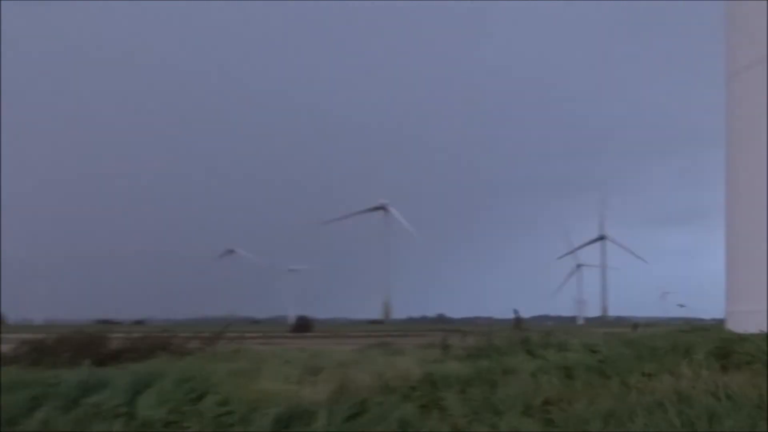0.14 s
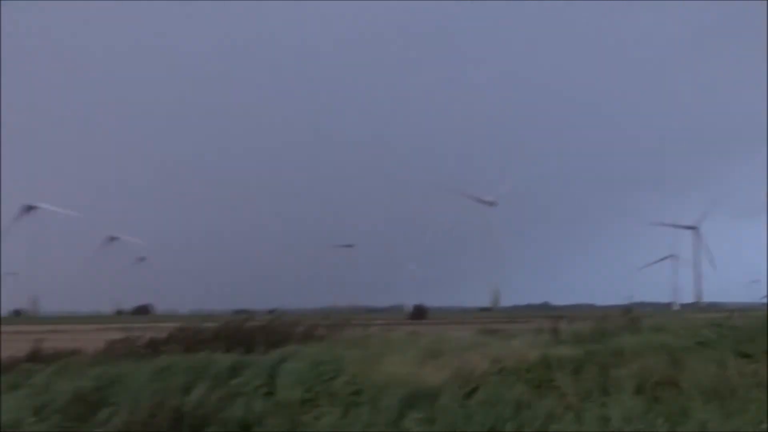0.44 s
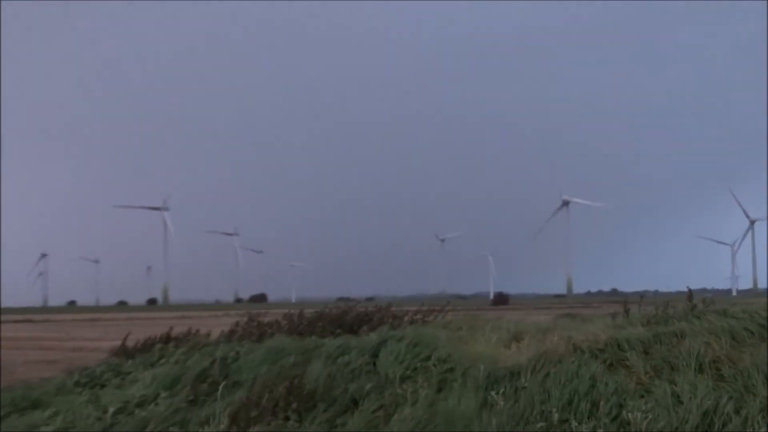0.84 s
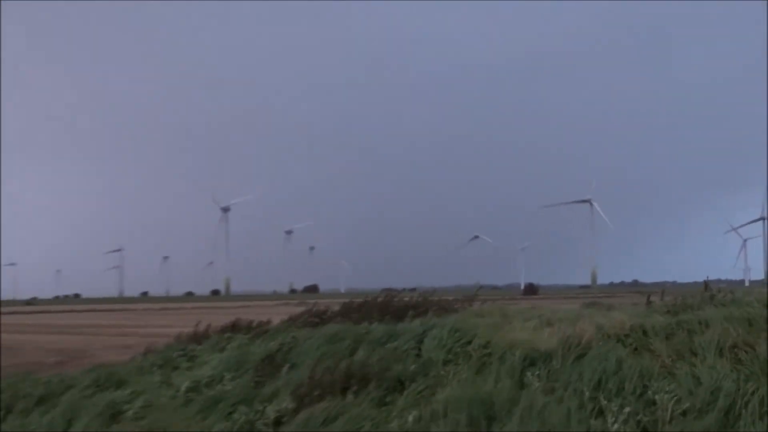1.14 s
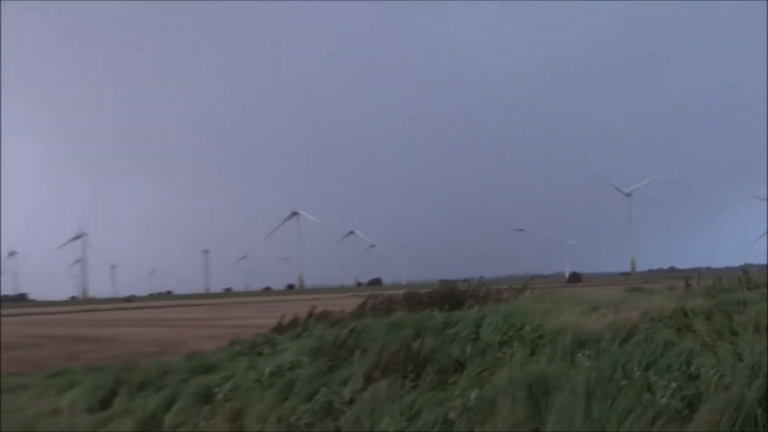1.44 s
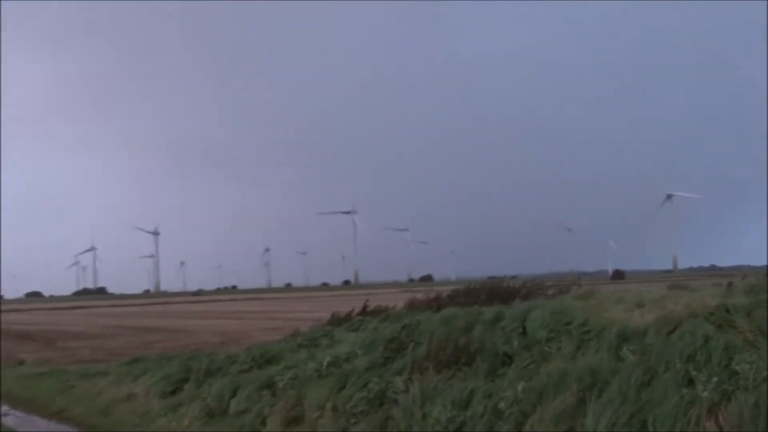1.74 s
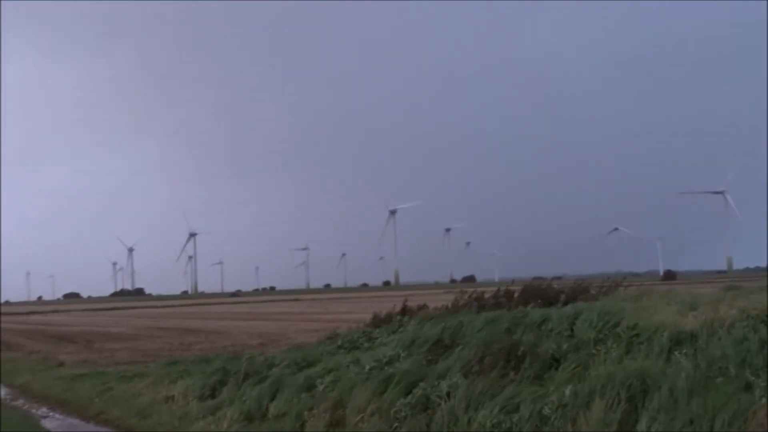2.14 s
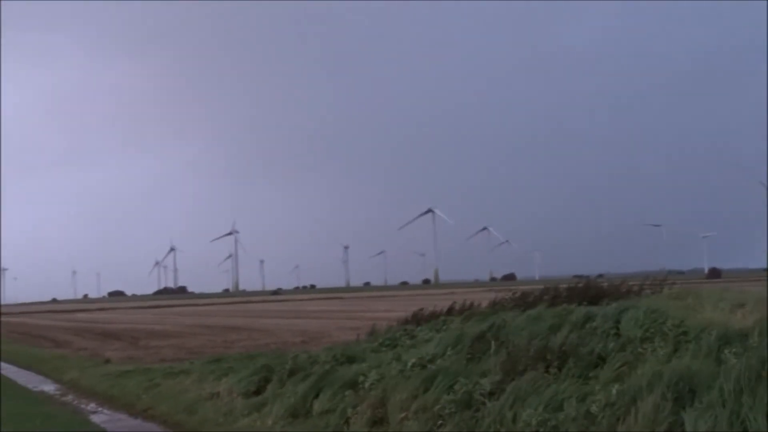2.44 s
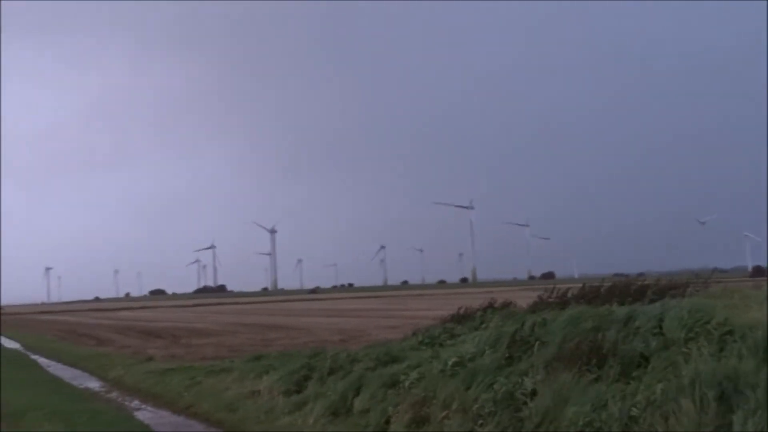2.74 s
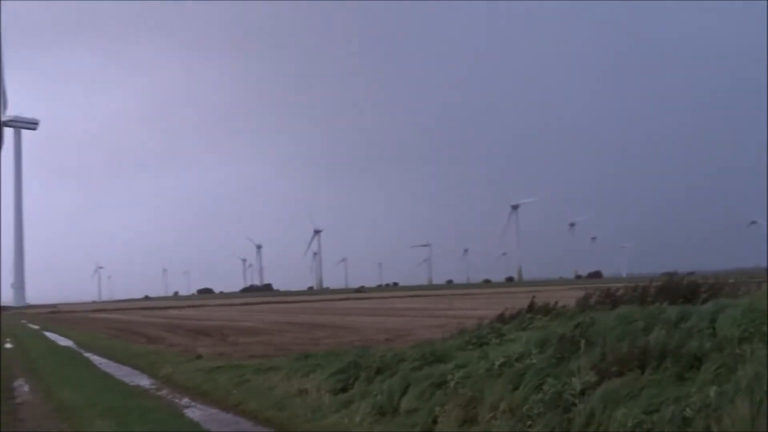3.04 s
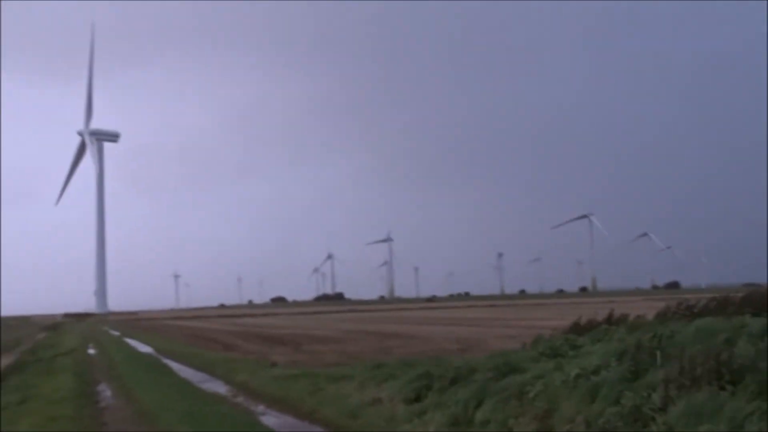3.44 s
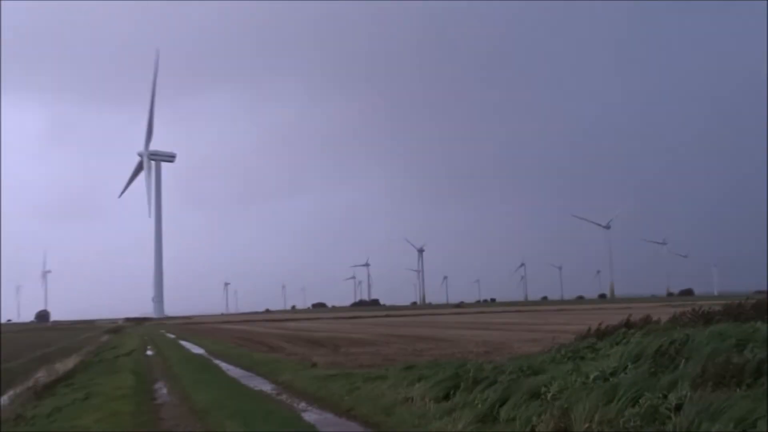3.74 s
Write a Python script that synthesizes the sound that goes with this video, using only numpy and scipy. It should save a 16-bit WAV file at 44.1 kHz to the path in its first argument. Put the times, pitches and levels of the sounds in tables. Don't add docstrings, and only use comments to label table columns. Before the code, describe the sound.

Storm wind roars directly on a hand-held camera's stereo microphone in an open field. Low, wide buffeting comes in slaps and ragged tearing bursts from the start, with a sharp spit near 0.8 s. A hard gust around 1.2 s breaks into short lulls. The wind drops near 2.2-2.4 s, then shoves again around 2.7 s. Grass hisses in puffs; a low hollow hum grows until the end.

```python
import sys
import numpy as np
from scipy import signal
from scipy.fft import rfft, irfft, next_fast_len
from scipy.io import wavfile
from scipy.ndimage import uniform_filter1d, map_coordinates

SR = 44100
rng = np.random.default_rng(int(sys.argv[2]) if len(sys.argv) > 2 else 0)


def put_to_file(sound):
    columns = np.atleast_2d(sound).T
    safe = np.clip(columns, -1, 1)
    whole_steps = np.round(safe * 32767)
    wavfile.write(sys.argv[1], SR, whole_steps.astype(np.int16))


def elevation(decibels):
    levels = np.asarray(decibels, float)
    return 10 ** (levels / 20)


N = 171108

# start_s, level_db
HISS_CURVE = [(0.0, -63), (0.3, -56.5), (0.6, -57.5), (0.9, -53.5), (1.19, -54), (1.49, -55.5),
              (1.79, -51.5), (2.09, -58.5), (2.39, -56), (2.69, -57.5), (2.98, -55.5), (3.28, -66),
              (3.58, -57), (3.88, -58)]
# start_s, body_shake_db, wind_on_both_ports_db
CAMERA_TURN = [
    (0, -23.5, -3),
    (.4, -29.5, -5.5),
    (.8, -31.5, 0.5),
    (1.35, -29.5, 0),
    (2.1, -29, 1.4),
    (2.65, -29.5, -1.5),
    (3.2, -30, 0.8),
    (3.55, -29, 0.6),
    (3.88, -31.5, 0.5),
]


def unit(x):
    return x / np.sqrt(np.mean(x ** 2) + 1e-20)


def along(points, hz):
    f, v = np.transpose(points)
    return np.interp(np.log(hz + 1), np.log(f + 1), v)


def column(rows, index):
    rows = np.transpose(rows)
    return np.interp(np.arange(N) / SR, rows[0], rows[index])


def level(curve, bumps, sign):
    t = np.arange(0, N + 64, 64) / SR
    s, length, height_db = np.transpose(bumps)[:, :, None]
    bells = np.exp(-(2 * (t - s) / np.maximum(length, 1e-3)) ** 2)
    db = np.interp(t, *np.transpose(curve)) + sign * (height_db * bells).sum(0)
    return np.interp(np.arange(N) / SR, t, db)


def wobble(rate):
    return map_coordinates(rng.standard_normal(N // 20), [np.arange(N) * rate / SR])


def filtered(x, response):
    m = next_fast_len(N + SR // 2)
    return irfft(rfft(x, m) * response(np.fft.rfftfreq(m, 1 / SR)), m)[..., :N]


def coloured(x, spectrum, gain_db):
    return unit(filtered(x, lambda hz: elevation(along(spectrum, hz)))) * elevation(gain_db)


def rush(patchy_db, lumps_db):
    z = signal.stft(rng.standard_normal((2, N)), nperseg=512)[2]
    field = uniform_filter1d(rng.standard_normal(z.shape[1:]), size=8, axis=0)
    field = uniform_filter1d(field, size=8, axis=1)
    noise = signal.istft(z * elevation(patchy_db * unit(field)), nperseg=512)[1][:, :N]
    return unit(noise * elevation(lumps_db))


def leaning(a, b):
    # pitch_hz, share
    lean = [(35, 0.47), (90, 0.54), (250, 0.55), (450, 0.64), (800, -0.2), (1500, -0.27), (4000, -0.045)]
    share = lambda hz: np.clip(along(lean, hz), -.99, .99)
    return filtered(a, share) + filtered(b, lambda hz: np.sqrt(1 - share(hz) ** 2))


def grass(puff_db, eddy_db, spit_db):
    # pitch_hz, level_db
    air_colour = [(500, 4.5), (2000, -6), (5400, 2.5), (6600, -2.5), (8500, -2.5), (10500, -8.5),
                  (12000, -23), (15700, -40)]
    # pitch_hz, level_db
    air_side_colour = [(3000, -24), (7000, -14), (8500, -10), (10500, -6), (12000, -14), (15700, -26)]
    # pitch_hz, level_db
    fine_colour = [(7500, -25), (10000, 7), (13300, 7.5), (14500, 0), (15700, -4), (16000, -60)]
    # pitch_hz, level_db
    far_colour = [(150, 15), (1000, -5), (5800, -23), (9000, -39)]
    # start_s, level_db
    fizz_curve = [(0, -61), (.25, -71), (.75, -69), (1.1, -58), (1.45, -67.5), (2.0, -64.5), (2.4, -61.5),
                  (2.6, -67.5), (3.1, -72.5), (3.52, -62), (3.7, -77), (3.88, -77)]
    # middle_s, length_s, rise_db
    swells = [(0.06, 0.091, 13), (0.18, 0.018, 3), (0.404, .04, 5), (.62, 0.012, 10), (0.927, 0.022, 21),
              (1.025, .025, 9), (1.14, 0.037, 15), (1.287, .05, 4), (1.547, 0.034, 17), (2.183, 0.045, 11),
              (2.31, 0.042, 12), (2.39, 0.028, 6), (2.74, 0.075, -4), (3.52, 0.12, 0), (3.71, .03, 0)]
    air_db, air_wide_db, air_left_db = 1.5, -12.5, -0.5
    fizz_gain_db, fizz_puffs, fizz_wide_db = 3, 0.05, -6.5

    grain_db = 0.41 * eddy_db + 2.7 * wobble(29.95) + spit_db
    a, b = rush(patchy_db=2.0, lumps_db=grain_db + 3.0 * wobble(500))
    mid = coloured(a, air_colour, puff_db + air_db)
    side = coloured(b, air_side_colour, puff_db + air_db + air_wide_db)

    a, b = rush(patchy_db=-2.5, lumps_db=0.85 * grain_db + 1.8 * wobble(300))
    puffs_only_db = puff_db - column(HISS_CURVE, index=1)
    fizz_db = level(fizz_curve, swells, 0.53) + fizz_gain_db + fizz_puffs * puffs_only_db
    mid = mid + coloured(a, fine_colour, fizz_db)
    side = side + coloured(b, fine_colour, fizz_db + fizz_wide_db)

    far = rush(patchy_db=1.5, lumps_db=wobble(4))[0]
    mid = mid + coloured(far, far_colour, gain_db=-57)
    return np.array([mid + side, mid - side]) * elevation([[air_left_db], [-air_left_db]])


def drone(gust_db):
    # pitch_hz, level_db
    hum_colour = [(90, -60), (140, -0.5), (200, 3), (245, -9.5), (330, -60.5)]
    start_db, grows_db_per_s, follows_wind = -43.5, 3.5, 0.64
    air = rush(patchy_db=1.5, lumps_db=3.4 * wobble(11))[0]
    hum_db = start_db + grows_db_per_s * np.arange(N) / SR + follows_wind * (gust_db - gust_db.mean())
    return coloured(air, hum_colour, hum_db) * elevation([[3.5], [-3.5]])


def body(gust_db):
    # pitch_hz, level_db
    rumble_colour = [(8.8, -60), (40, -12.5), (92, 3), (161, -3), (200, -8.5), (260, -15), (440, -120)]
    # pitch_hz, level_db
    sway_colour = [(8.8, -35), (22, -5.5), (60, -3), (95, -10.5), (150, -120)]
    # middle_s, length_s, rise_db
    shoves = [(0.057, 0.12, -6.5), (0.406, 0.034, 4), (0.975, .06, 8), (1.397, .07, 8), (1.61, 0.022, 9),
              (1.729, 0.032, 7.5), (1.873, 0.17, 5), (2.417, 0.029, 15), (2.623, 0.14, 10.5),
              (2.747, 0.034, -2), (3.148, .08, 8), (3.356, 0.088, 1)]
    rumble_db, rumble_follows, rumble_left_db = -0.5, 0.48, 3
    start_sway_db, sway_fades_db_per_s = -30, 3

    swing_db = gust_db - gust_db.mean()
    push, slow = rush(patchy_db=-0.14, lumps_db=1.5 * wobble(7.6))
    shove_db = level([row[:2] for row in CAMERA_TURN], shoves, 0.8) + rumble_follows * swing_db
    shake = coloured(push, rumble_colour, rumble_db + shove_db)
    shake = shake * elevation([[rumble_left_db], [-rumble_left_db]])
    sway_db = start_sway_db + 0.29 * swing_db - sway_fades_db_per_s * np.arange(N) / SR
    return shake + coloured(slow, sway_colour, sway_db)


def spits(gust_db):
    # start_s, peak_db
    spit_events = [(0.168, -38), (0.411, -30), (0.51, -35), (0.587, -43), (0.642, -43), (0.7612, -17),
                   (1.3365, -40), (1.445, -37), (1.497, -40), (1.5878, -41), (2.72, -36.5), (2.758, -20),
                   (3.7095, -33), (3.786, -34)]
    length_s, hiss_below_db = 0.0048, 47
    random_db, threshold = 8, 1.38
    t = np.arange(N) / SR
    push = wobble(260) + 0.073 * (gust_db - gust_db.mean())
    out = np.clip(random_db * (push - threshold), 0, 5)
    for s, db in spit_events:
        out = out + np.clip(db + hiss_below_db, 0, 10) * np.exp(-((t - s - length_s) / length_s) ** 2)
    return out


def slaps():
    slap_times = [0.12, 0.335, 0.396, 0.549, 0.586, 0.896, 1.038, 1.183, 1.32, 1.496, 1.794, 2.067, 2.413,
                  2.571, 2.719, 2.864, 3.087, 3.212, 3.4]
    slap_db, rise_s, fall_60db_s = 7.5, .001, .035
    out, t = np.zeros(N + SR), np.arange(SR // 10) / SR
    shape = elevation(slap_db - 60 * t / fall_60db_s) * (1 - np.exp(-t / rise_s))
    for s in slap_times:
        out[round(s * SR):][:len(t)] += shape
    return 20 * np.log10(1 + out[:N])


def bursts():
    # start_s, peak_db
    burst_events = [(0.061, -23.5), (0.1204, -23.5), (0.1431, -33), (0.1695, -31), (0.229, -28.5),
                    (0.324, -30.5), (0.3953, -25.5), (0.511, -34.5), (0.5455, -27), (0.6434, -30),
                    (0.683, -22), (0.8145, -24), (0.8774, -32), (1.039, -33), (1.1039, -31.5), (1.182, -36),
                    (1.2037, -35), (1.221, -26.5), (1.321, -19), (1.496, -31), (1.5395, -18), (1.5904, -31),
                    (1.6215, -22.5), (1.7963, -35), (1.8432, -29), (1.9759, -29), (2.1231, -39),
                    (2.5466, -35), (2.571, -33), (2.6706, -24.5), (2.7064, -27), (2.8684, -28),
                    (2.9306, -26.5), (3.2131, -43), (3.2794, -33), (3.2999, -33), (3.4007, -34),
                    (3.536, -30), (3.648, -24.5), (3.708, -33.5), (3.7668, -34), (3.7876, -32.5)]
    # pitch_hz, level_db
    burst_colour = [(250, -26), (500, 0.5), (1200, 2), (3000, -13.5), (5600, -19.5), (6500, -27.5),
                    (9000, -27.5), (14000, -49), (15700, -60)]
    burst_db, wide_db, rise_s, fall_60db_s = -5.5, -1, .0015, 0.055
    out, t = np.zeros(N + SR), np.arange(SR // 8) / SR
    for s, db in burst_events:
        fall = elevation(db + burst_db - 60 * t / fall_60db_s)
        out[round(s * SR):][:len(t)] += fall * (1 - np.exp(-t / rise_s))
    a, b = rush(patchy_db=1.5, lumps_db=1.85 * wobble(300))
    mid = coloured(leaning(a, b), burst_colour, 0)
    side = coloured(a, burst_colour, wide_db)
    return out[:N] * np.array([mid + side, mid - side])


def ports(gust_db, puff_db, eddy_db, spit_db):
    # pitch_hz, level_db
    roar_sum = [(35, -51), (60, -11.5), (134, -2), (233, -2), (442, -9), (893, -21.5), (1280, -26.5),
                (3000, -40.5), (3900, -45), (6600, -120)]
    # pitch_hz, level_db
    roar_diff = [(18, -65), (30, -27), (59, -32), (148, 0.5), (397, -0.5), (926, -13), (1390, -19),
                 (3000, -35), (3900, -44), (6600, -120)]
    # pitch_hz, level_db
    tear_colour = [(500, -46), (1000, -2.5), (2000, -6), (4000, -10.5), (5600, -15.5), (6300, -25),
                   (9000, -20), (14000, -77)]
    sum_db, diff_db, tear_sum_db, tear_diff_db = -4, -1.5, -24, -26
    sum_follows, tear_follows, tear_puffs = 1, 0.5, 0.93

    mean_db = gust_db.mean()
    swing_db = gust_db - mean_db
    a, b = rush(patchy_db=0.5, lumps_db=0.81 * eddy_db)
    mid_db = mean_db + sum_db + sum_follows * swing_db + column(CAMERA_TURN, index=2)
    mid = coloured(leaning(a, b), roar_sum, mid_db)
    side = coloured(a, roar_diff, gust_db + diff_db)

    a, b = rush(patchy_db=0.0, lumps_db=0.33 * eddy_db + 2.8 * wobble(400) + .7 * spit_db)
    tear_db = mean_db + tear_follows * swing_db + tear_puffs * (puff_db - puff_db.mean())
    mid = mid + coloured(leaning(a, b), tear_colour, tear_db + tear_sum_db)
    side = side + coloured(a, tear_colour, tear_db + tear_diff_db)
    return np.array([mid + side, mid - side])


def scene():
    # start_s, level_db
    gust_curve = [(0.0, -24), (0.3, -21), (0.6, -18.5), (0.9, -21.5), (1.19, -8), (1.49, -19.5),
                  (1.79, -16.5), (2.09, -19.5), (2.39, -28), (2.69, -15), (2.98, -19.5), (3.28, -20.5),
                  (3.58, -21), (3.88, -23)]
    # middle_s, length_s, depth_db
    lulls = [(0.128, 0.019, 5.5), (0.166, 0.0078, -3), (0.285, 0.061, 16), (0.362, 0.06, 11),
             (0.527, 0.051, 14), (0.973, 0.1, 14), (1.028, 0.026, 12.5), (1.091, 0.089, 23.5),
             (1.181, 0.072, 18), (1.255, 0.071, 10), (1.333, 0.059, 4.5), (1.436, 0.02, 4),
             (1.47, 0.039, 14), (2.097, 0.051, 9.5), (2.186, 0.063, 24.5), (2.359, 0.068, 24.5),
             (2.402, 0.016, 8.5), (2.487, 0.087, 12), (2.539, 0.022, 22), (2.651, 0.13, 6),
             (2.783, 0.029, 3), (2.856, 0.025, 10.5), (3.112, 0.082, 7), (3.199, 0.033, 10),
             (3.383, 0.025, 6.5), (3.444, 0.026, 6.2), (3.593, 0.12, 5.5)]
    # middle_s, length_s, rise_db
    puffs = [(0.05, 0.2, 10.5), (0.151, 0.0079, 17), (0.183, 0.018, 11), (0.435, 0.032, 10.5),
             (0.557, 0.059, 7), (0.613, 0.019, 13.5), (0.708, 0.019, 7.5), (0.933, 0.034, 4.5),
             (1.018, 0.052, 5), (1.135, 0.058, 6), (1.33, 0.23, 5), (1.447, 0.008, 5.5), (1.52, 0.017, 6),
             (1.544, 0.027, 9.5), (1.608, 0.0091, 9), (2.05, 0.029, 4), (2.186, 0.052, 8),
             (2.294, 0.074, 5.5), (2.39, 0.0093, -7), (2.76, 0.068, 4.5), (2.819, 0.015, 7.5),
             (3.3, 0.28, 10), (3.504, 0.045, 5.5), (3.67, 0.037, 6), (3.73, 0.014, 8)]
    gust_db = level(gust_curve, lulls, -1.093)
    puff_db = level(HISS_CURVE, puffs, 0.85)
    eddy_db = 0.27 * wobble(24.77) + 2.06 * wobble(70) + 1.35 * wobble(170) + slaps()
    spit_db = spits(gust_db)
    background = grass(puff_db, eddy_db, spit_db) + drone(gust_db) + body(gust_db)
    return background + bursts() + ports(gust_db, puff_db, eddy_db, spit_db)


def thinned(x):
    # pitch_hz, share_of_sum, share_of_difference
    emptied = [(2000, 0, .0), (4500, .01, .06), (6600, .06, .18), (8800, .02, .07), (11300, .09, .16),
               (12800, .05, .25), (14000, .2, .45), (15200, .62, .75)]
    masking = 0.56
    hz, _, z = signal.stft(np.array([x[0] + x[1], x[0] - x[1]]) / 2, SR, nperseg=1024)
    band_hz = hz[2::4]
    power = uniform_filter1d(np.abs(z[:, :-1]) ** 2, size=5, axis=2)
    bands = 10 * np.log10(power.reshape(2, 128, 4, -1).mean(2) + 1e-20)
    bands[0] -= masking * uniform_filter1d(bands[0, :4].mean(0), size=9)
    chance = uniform_filter1d(rng.standard_normal(bands.shape), size=7, axis=2)
    bands += np.where(band_hz[:, None] < 13300, 20, 4) * chance
    rank = bands.argsort(2).argsort(2) / bands.shape[2]
    f, *shares = np.transpose(emptied)
    keep = rank >= np.array([np.interp(band_hz, f, share) for share in shares])[:, :, None]
    z = z * np.pad(np.repeat(keep, 4, axis=1), ((0, 0), (0, 1), (0, 0)))
    mid, side = signal.istft(z, SR, nperseg=1024)[1][:, :N]
    return np.array([mid + side, mid - side])


def roll_off(x):
    return signal.sosfilt(signal.butter(12, 15780, fs=SR, output="sos"), x)


def record(dry):
    top, hard = .56, 4.5
    squeezed = dry / (1 + np.abs(dry / top) ** hard) ** (1 / hard)
    mix = thinned(squeezed)
    return roll_off(mix)


dry = scene()
out = record(dry)
put_to_file(out)
```